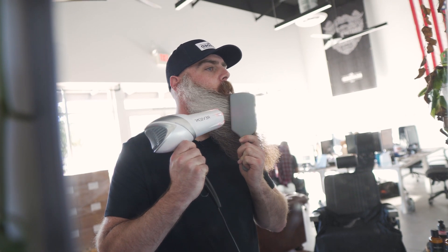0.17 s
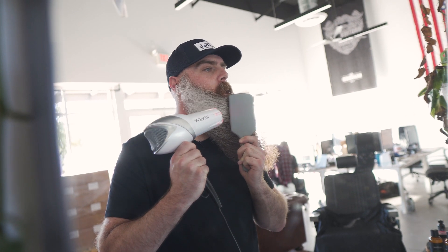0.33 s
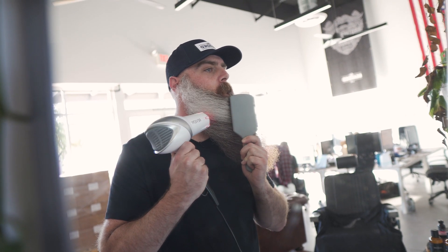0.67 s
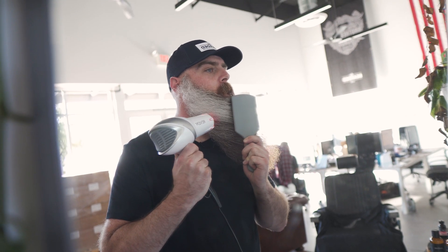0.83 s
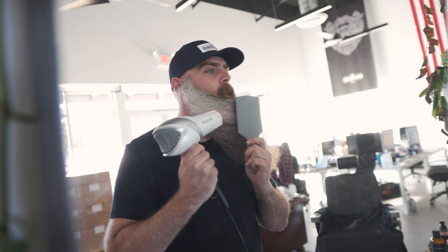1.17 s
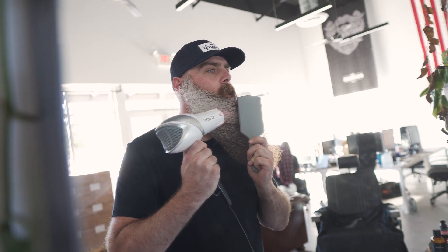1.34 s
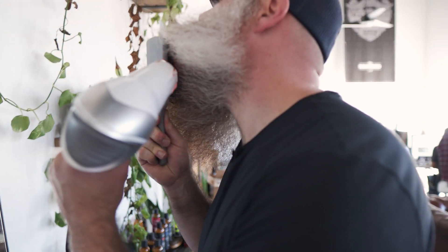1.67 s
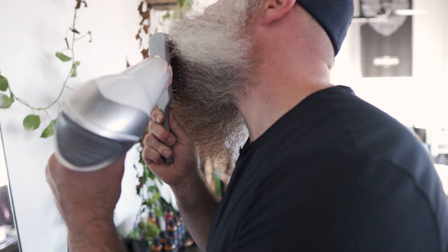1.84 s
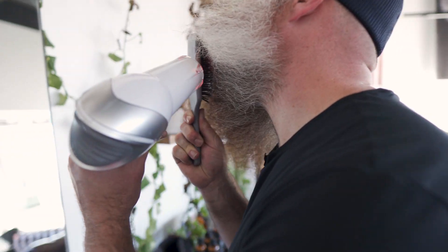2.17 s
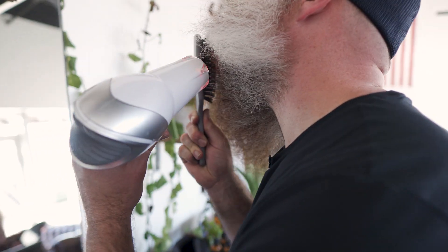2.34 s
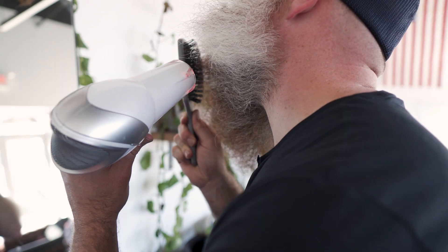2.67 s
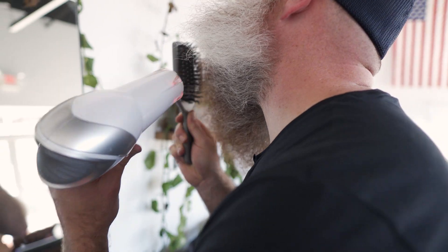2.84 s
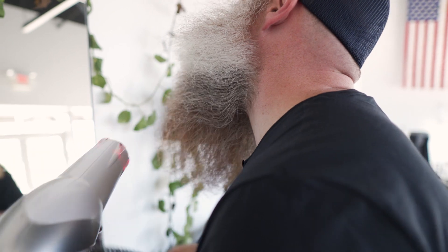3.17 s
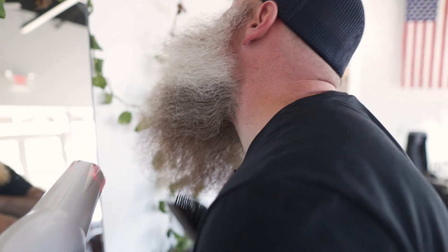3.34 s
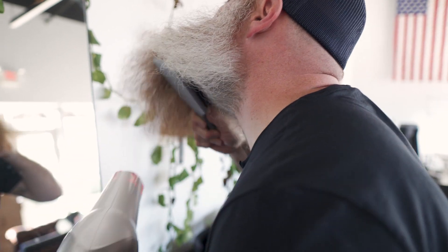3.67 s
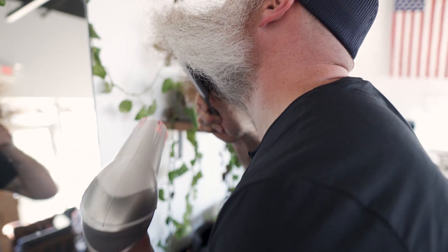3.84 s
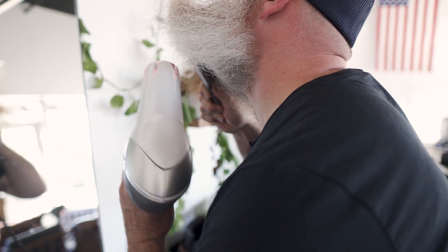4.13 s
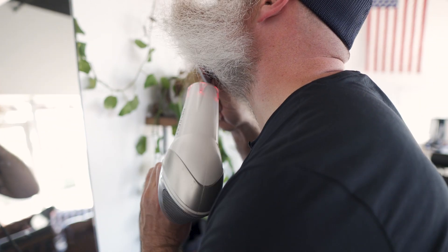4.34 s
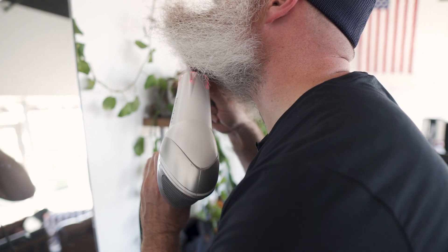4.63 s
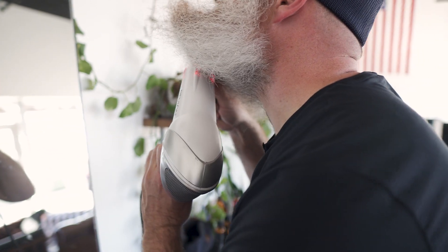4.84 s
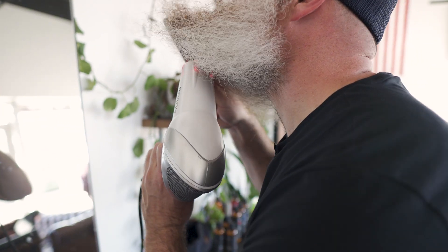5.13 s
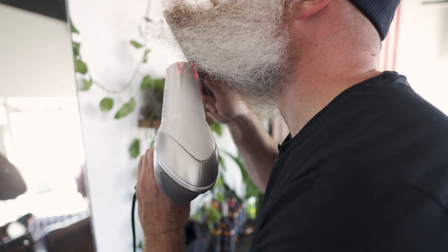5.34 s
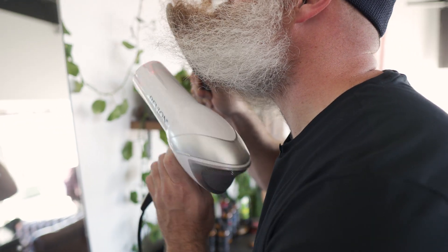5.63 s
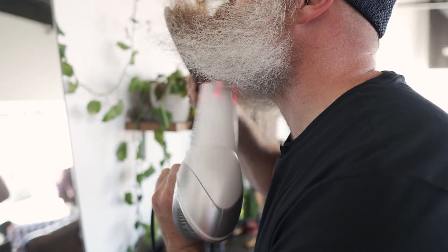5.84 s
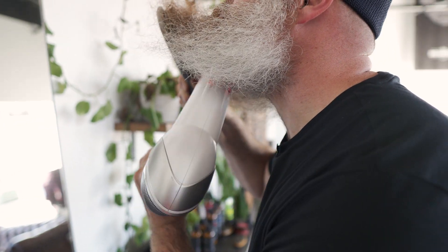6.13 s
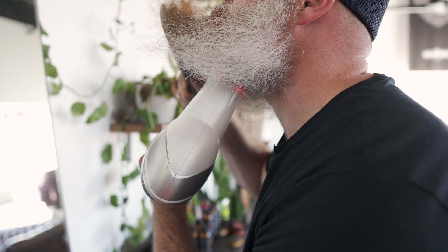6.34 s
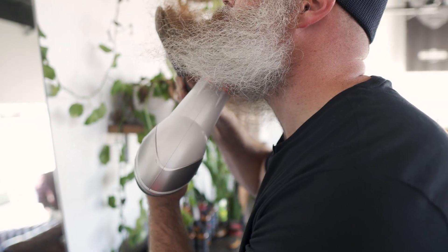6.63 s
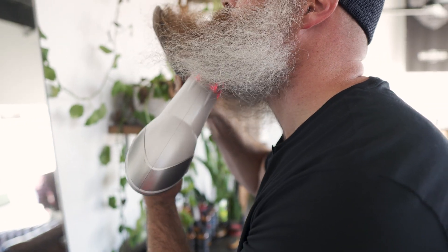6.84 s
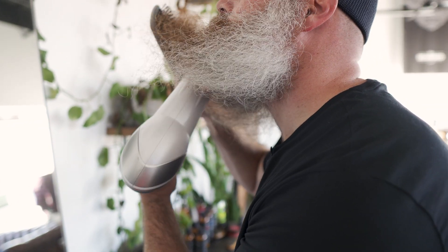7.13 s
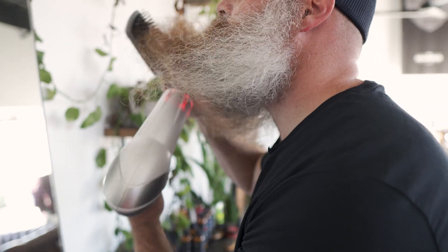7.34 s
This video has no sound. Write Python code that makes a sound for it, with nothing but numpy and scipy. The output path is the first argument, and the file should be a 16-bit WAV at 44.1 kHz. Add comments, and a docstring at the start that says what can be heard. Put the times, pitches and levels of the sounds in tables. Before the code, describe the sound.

Close, centred sound of a low-speed hair dryer drying a thick beard. An even fan whine sits inside breathy, broadband airflow. First heard from in front with more hum, then suddenly from the side. The whine dips as the nozzle moves away, a few low wind bumps brush the microphone, and it returns with a hollow, stronger roar beneath the beard, followed by brighter hissing sweeps, still running at the end.

```python
"""A steady fan whine over hum and rushing air: a hair dryer on its low setting dries a beard in a large room,
heard first from in front, then abruptly from the side. The whine and weaker tones are sines on multiples of
the shaft speed, the hum two mains sines. The air is coloured noise: it roars in the barrel, rushes through the
grille and hisses on hair and brush as the nozzle moves. The jet brushes the microphone in a few soft low puffs."""
import sys
import numpy as np
from scipy import signal
from scipy.fft import rfft, irfft
from scipy.io import wavfile
from scipy.ndimage import uniform_filter1d

SR = 44100
rng = np.random.default_rng(int(sys.argv[2]) if len(sys.argv) > 2 else 0)


def inscribe(sig):
    """Save sig as 16-bit PCM at rate SR to the path in sys.argv[1].

    A 1-D sig is mono; a 2-D sig holds one channel per row.
    Samples are clipped to [-1, 1] before scaling.
    """
    pcm = np.round(np.clip(np.atleast_2d(sig).T, -1, 1) * 32767)
    wavfile.write(sys.argv[1], SR, pcm.astype(np.int16))


N = 330750
TIME = np.arange(N) / SR  # seconds
FREQ = np.maximum(np.fft.rfftfreq(N, 1 / SR), 1)  # Hz

TURN_S = 1.45  # the listening position jumps from front to side
WHINE_ORDER = 4  # whine cycles per shaft turn
MAINS_HZ = 60
HUM_SHAKE = 0.6  # dB of hum per dB of rumble in a sweep
SIZZLE_HZ, SIZZLE_WIDTH_HZ = 13800, 5200  # the top treble
TOP_HZ = 15750  # upper edge of the finished sound

# Weaker motor tones. Each row: multiple of the shaft speed, level in dB with the dryer held level,
# level in dB with it held upright.
SHAFT_TONES = [(1, -62.5, -53.5), (2, -57, -51.5), (3, -50.5, -47.5), (5, -63, -50), (6, -52.5, -47),
               (7, -51.5, -68), (9, -52.5, -56), (10, -47.5, -51), (12, -64, -52.5)]
# Fan whine, drifting slowly lower, with a brief dip in pitch as the tone fades near 6.47 s.
# Each row: time in seconds, pitch in Hz.
WHINE_PITCH = [(0.0, 788), (2.54, 790.2), (3.49, 787.5), (3.95, 788.8), (5.27, 783.0), (6.32, 783),
               (6.47, 777.5), (7.42, 783.8)]
# Tones fading or swelling as the dryer passes through the room's standing waves. Each row: multiple of the
# shaft speed, centre in seconds, half length in seconds, change in dB.
STANDING_WAVES = [(4, 0.76, 0.28, -5), (4, 1.28, 0.24, -3.5), (4, 5.9, .08, -5), (4, 6.47, 0.052, -16),
                  (8, .75, .15, 6), (8, 6.55, 0.7, 6.5), (6, 7.35, 0.23, 5)]

# How the dryer is held. Each row: time in seconds, pose from 0 level to 1 upright.
UPRIGHT = [(3.6, 0.083), (4.4, 0.9)]
# How closely the nozzle is tucked under the chin. Each row: time in seconds, closeness from 0 free to 1 close.
TUCKED = [(3.8, 0), (4.35, 0.94), (5.0, 0.99), (5.5, 0.79), (5.78, 0.97), (6.0, 0.65), (6.3, 0.44),
          (6.8, 0.31), (7.5, 0)]
# The dryer swung aside and back. Each row: time in seconds, place from 0 on the beard to 1 aside.
ASIDE = [(3.0, 0), (3.3, 0.72), (3.5, 1), (3.82, .7), (4.08, 0.21)]

# Levels of the tones. Each holds: from in front in dB, from the side in dB, change when tucked in dB,
# change when swung aside in dB.
WHINE_DB = (-32.5, -30.7, 4.5, -6.5)
OCTAVE_DB = (-48.5, -46, -0.5, -3)
HUM_DB = (-49, -61, 0, 4)
# Levels of the air before its resonances, and the lift of the top treble within the hiss. Each holds:
# from in front in dB, from the side in dB, change when tucked in dB, change when swung aside in dB.
RUMBLE_DB = (-41.5, -46.5, 0, 0)
ROAR_DB = (-35, -33, 4.5, -2)
HOLLOW_DB = (-40, -42, 12.5, 0.5)
RUSH_DB = (-31.5, -35, 0.4, -1.4)
HISS_DB = (-47.5, -46, .5, -4.5)
SIZZLE_DB = (.3, -1.2, 1.8, -.3)

# Colours of the air, from low rumble up to hiss. Each row: frequency in Hz, relative density in dB per Hz.
RUMBLE_COLOUR = [(20, -9), (45, -8), (75, -6), (110, -5.5), (200, -4), (300, 0), (420, 1.5), (800, -15)]
ROAR_COLOUR = [(200, -34), (330, -19.5), (480, -10.5), (590, -1.5), (700, 1.5), (780, -6.5), (880, -7.5),
               (1050, -27), (2000, -49)]
HOLLOW_COLOUR = [(550, -5.5), (750, 4), (900, 3), (1020, 3), (1200, 3), (1450, -7), (1800, -14),
                 (3000, -23)]
RUSH_FRONT_COLOUR = [(900, -22), (1200, 0.5), (1650, -3), (2000, -3), (2450, -5.5), (2900, -5),
                     (3400, -4.5), (4200, -9.5), (4900, -11.5), (6400, -21.5), (7500, -27), (9500, -26.5),
                     (12000, -38)]
RUSH_SIDE_COLOUR = [(900, -25), (1300, -2.5), (1650, 0.5), (2000, 0), (2500, -1.5), (3100, -4.5),
                    (3600, -3.5), (4200, -7), (4900, -9), (6400, -14.5), (7500, -19.5), (9500, -28),
                    (12000, -43)]
HISS_FRONT_COLOUR = [(3000, -11), (5500, 5), (7500, 2), (9500, 0), (11000, -5.5), (13000, -7), (16000, -11)]
HISS_SIDE_COLOUR = [(3000, -15), (5500, 2.5), (7500, 2), (9000, 3), (10500, 0), (12000, -2), (14000, -6),
                    (16000, -12)]

# Resonances and notches of the housing. Each row: centre in Hz, width in Hz, lift from in front in dB,
# lift from the side in dB.
CAVITIES = [(1945, 250, 9, 6.5), (2623, 150, 4, 2.5), (2980, 230, -2, 0), (3560, 240, 0, 0.5),
            (4140, 310, 1, 2.5), (4700, 350, -1.5, -0.5), (6340, 820, 3.5, 3), (8450, 400, 0.5, 2.5),
            (9600, 270, 4, 3), (10600, 900, 0.5, -0.5)]
# The barrel heard from in front. Each row: centre in Hz, width in Hz, lift in dB.
BARREL_FRONT = [(595, 70, 4.5), (820, 210, -4.5)]
# Brightening of air trapped under the chin. Each row: centre in Hz, width in Hz, lift in dB when fully tucked.
CHIN = [(2600, 300, 1.5), (4940, 1000, 2.5)]
# Nozzle modes that sound along in every held pose. Each row: centre in Hz, width in Hz, lift in dB.
NOZZLE = [(4220, 150, 2.5), (8250, 160, 3), (9620, 200, 0.5)]
# The gap between nozzle, brush and face rings or cancels while a pose is held. Each row: start in seconds,
# end in seconds, centre in Hz, width in Hz, lift in dB.
HELD_GAPS = [(1.45, 1.88, 2800, 120, 7.5), (3.18, 3.6, 4000, 400, -4), (4.62, 5.45, 4050, 200, 4.5),
             (4.82, 5.5, 1890, 400, -6), (5.57, 5.87, 4190, 170, 8), (5.9, 6.702, 1830, 500, 3.5),
             (6.25, 7.0, 12000, 400, 5), (6.62, 7.5, 4000, 200, 3)]
# The jet sweeping across hair and brush. Each row: centre in seconds, half length in seconds,
# lift of hiss in dB, of rush in dB, of rumble in dB, of the top treble in dB.
SWEEPS = [(0.804, 0.31, 12, 5, 4.5, -1), (1.327, .2, 3.5, 1.9, 0.5, -1), (1.65, 0.3, 4, 0.5, 2.5, -1),
          (4.384, 0.19, 4, -0.5, 1.5, 0), (5.044, .22, 1.5, 0.5, 1, 1), (5.728, 0.087, 5, 4.5, 8.5, 5),
          (5.992, .075, 5.5, 1.5, 5, 2), (6.43, 0.32, 8.5, 0.7, 4.5, 3.8), (7.057, 0.22, 3.5, .5, 1, 2)]
# Inverted echo off the edge of the brush as the nozzle swings back. Each row: time in seconds,
# delay in milliseconds, strength relative to the direct sound.
BRUSH_ECHO = [(3.2, .62, 0), (3.6, .57, .18), (3.85, .51, .33), (4.05, .36, .26), (4.35, .3, .15),
              (4.6, .28, 0)]
# Jet on the microphone. Each row: peak in seconds, half length in seconds, centre in Hz, peak level in dB.
PUFFS = [(1.67, .025, 40, -53), (1.92, .025, 36, -52), (3.627, .025, 50, -40), (3.657, .022, 80, -40),
         (3.684, .02, 130, -39.5)]


def motor(shaft, hum_shake_db):
    """Fan whine, its octave, weaker shaft multiples and the hum of the half-wave supply."""
    upright, = curves(UPRIGHT)
    octave_order = 2 * WHINE_ORDER
    whine = tone(WHINE_ORDER * shaft, posed(*WHINE_DB) + fade(WHINE_ORDER), waver_db=0.77)
    octave_turns = octave_order * shaft + 0.038 * walk(7.5)  # slight phase drift
    octave = tone(octave_turns, posed(*OCTAVE_DB) + fade(octave_order), waver_db=2.0)

    weak = 0
    for order, level_db, upright_db in SHAFT_TONES:
        turns = order * shaft + 0.036 * walk(7.2)
        held_db = level_db + upright * (upright_db - level_db)
        weak = weak + tone(turns, held_db + fade(order), waver_db=2.5)

    hum = tone(MAINS_HZ * TIME, posed(*HUM_DB) + hum_shake_db, waver_db=1.5)
    hum_octave = tone(2 * MAINS_HZ * TIME, -64.5, waver_db=2.5)
    return whine + octave + weak + hum + hum_octave


def air(shaft, rumble_db, hiss_db, rush_db, sizzle_db):
    """Turbulence in barrel, nozzle and hair; hiss throbs with the shaft, all treble with the mains."""
    in_front = TIME < TURN_S

    rumble = undb(posed(*RUMBLE_DB) + rumble_db) * noise(RUMBLE_COLOUR)
    roar = undb(posed(*ROAR_DB)) * noise(ROAR_COLOUR)
    hollow = undb(posed(*HOLLOW_DB) + rush_db) * noise(HOLLOW_COLOUR)
    body = rumble + roar + hollow
    body = body + in_front * ring(body, BARREL_FRONT)

    front_db = sum(db * bell(hz, width) for hz, width, db, _ in CAVITIES)
    side_db = sum(db * bell(hz, width) for hz, width, _, db in CAVITIES)
    rush = np.where(in_front, noise(RUSH_FRONT_COLOUR, front_db), noise(RUSH_SIDE_COLOUR, side_db))
    rush = rush * undb(posed(*RUSH_DB) + rush_db)
    hiss = np.where(in_front, noise(HISS_FRONT_COLOUR, front_db), noise(HISS_SIDE_COLOUR, side_db))
    hiss = hiss * undb(posed(*HISS_DB) + hiss_db)
    hiss = hiss + ring(hiss, [(SIZZLE_HZ, SIZZLE_WIDTH_HZ, posed(*SIZZLE_DB) + sizzle_db)])

    shaft_throb = 1 + 0.075 * np.sin(2 * np.pi * shaft)
    mains_throb = 1 + 0.032 * np.sin(2 * np.pi * MAINS_HZ * TIME)
    flicker = undb(0.44 * walk(13))
    treble = reflect(rush + hiss * shaft_throb) * mains_throb * flicker
    return body + ring_gaps(treble, fade_s=0.09)


def reflect(x):
    """A short, slightly dull, inverted echo of moving delay sweeps a comb through the treble."""
    delay_ms, strength = curves(BRUSH_ECHO)
    dull = uniform_filter1d(x, size=3)
    late = np.interp(TIME - delay_ms / 1000, TIME, dull)
    return (x - strength * late) / np.hypot(1, strength)  # keeps the overall level


def ring_gaps(x, fade_s):
    """Each held pose fades in the note of its gap and the nozzle's modes; the chin adds its own colour."""
    tucked, = curves(TUCKED)
    out = x + tucked * ring(x, CHIN)
    still = 0
    for start, end, hz, width, db in HELD_GAPS:
        inside_s = np.minimum(TIME - start, end - TIME)
        held = np.clip(0.5 + inside_s / fade_s, 0, 1)
        out = out + held * ring(x, [(hz, width, db)])
        still = np.maximum(still, held)
    return out + still * ring(x, NOZZLE)


def sweeps():
    """Lifts in dB of hiss, rush, rumble and top treble while the jet crosses the hair."""
    return sum(np.outer(lifts_db, bump(s, length)) for s, length, *lifts_db in SWEEPS)


def buffet():
    """The jet sweeps over the microphone in soft low eddies."""
    out = 0
    for s, length, hz, db in PUFFS:
        eddy = noise([(hz / 4, -12), (hz, 0), (2 * hz, -9), (4 * hz, -26)])
        out = out + undb(db) * bump(s, length) * eddy
    return out


def tone(turns, db, waver_db):
    """A partial whose strength wavers as the dryer moves among the room's reflections."""
    level = undb(db + waver_db * walk(14.4))
    start = rng.random()  # random phase, in turns
    return np.sqrt(2) * level * np.sin(2 * np.pi * (turns + start))


def noise(points, lift_db=0):
    """Noise of rms 1 with the colour of (Hz, dB) points, joined along a log frequency axis."""
    hz, db = np.transpose(points)
    colour_db = np.interp(np.log(FREQ), np.log(hz), db, left=-70, right=-70) + lift_db
    y = irfft(rfft(rng.standard_normal(N)) * undb(colour_db), N)
    return y / y.std()


def walk(rate):
    """Smooth random drift of spread 1, low-passed so it moves about rate times a second."""
    smooth = np.exp(-np.minimum(FREQ / rate, 20) ** 2)
    y = irfft(rfft(rng.standard_normal(N)) * smooth, N)
    return (y - y.mean()) / y.std()


def ring(x, modes):
    """What (Hz, width, lift dB) resonances add to a sound; negative lifts take away."""
    spectrum = rfft(x)
    return sum((undb(db) - 1) * irfft(spectrum * bell(hz, width), N) for hz, width, db in modes)


def bell(hz, width):
    """Bell curve of one resonance over frequency: 1 at its centre, half at the edges of its width."""
    return 1 / (1 + (2 * (FREQ - hz) / width) ** 2)


def posed(front_db, side_db, tucked_db, aside_db):
    """Level in dB of one part, from the listening position and the place of the nozzle."""
    tucked, = curves(TUCKED)
    aside, = curves(ASIDE)
    return np.where(TIME < TURN_S, front_db, side_db) + tucked_db * tucked + aside_db * aside


def fade(order):
    """Change in dB of one shaft multiple among the standing waves."""
    return sum(db * bump(s, length) for multiple, s, length, db in STANDING_WAVES if multiple == order)


def bump(s, length):
    """A smooth rise and fall, 1 at time s and 1/e one length away."""
    return np.exp(-((TIME - s) / length) ** 2)


def curves(table):
    """The columns of a timed table, one value per sample, in straight lines between rows."""
    s, *columns = np.transpose(table)
    return [np.interp(TIME, s, column) for column in columns]


def undb(db):
    """Decibels to gain."""
    return 10 ** (np.asarray(db) / 20)


def scene():
    """One motor drives tones and air; the sound sits in the centre."""
    whine_hz, = curves(WHINE_PITCH)
    shaft_hz = whine_hz / WHINE_ORDER * (1 + 0.0005 * walk(13.6))  # slightly unsteady
    shaft = np.cumsum(shaft_hz) / SR  # turns
    hiss_db, rush_db, rumble_db, sizzle_db = sweeps()
    tones = motor(shaft, HUM_SHAKE * rumble_db)
    turbulence = air(shaft, rumble_db, hiss_db, rush_db, sizzle_db)
    mono = tones + turbulence + buffet()
    return np.array([mono, mono])


def record(dry):
    """The recorder cuts the top steeply with an elliptic low-pass."""
    low_pass = signal.ellip(12, 0.1, 80, TOP_HZ, fs=SR, output="sos")  # 0.1 dB ripple, 80 dB stop band
    return signal.sosfilt(low_pass, dry)


dry = scene()
out = record(dry)
inscribe(out)
```